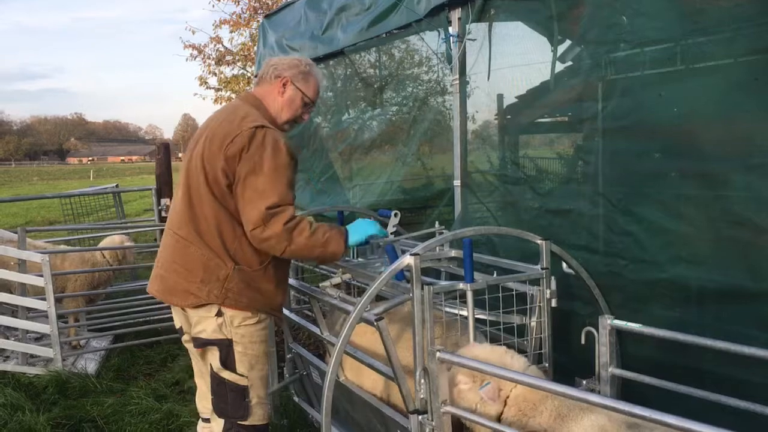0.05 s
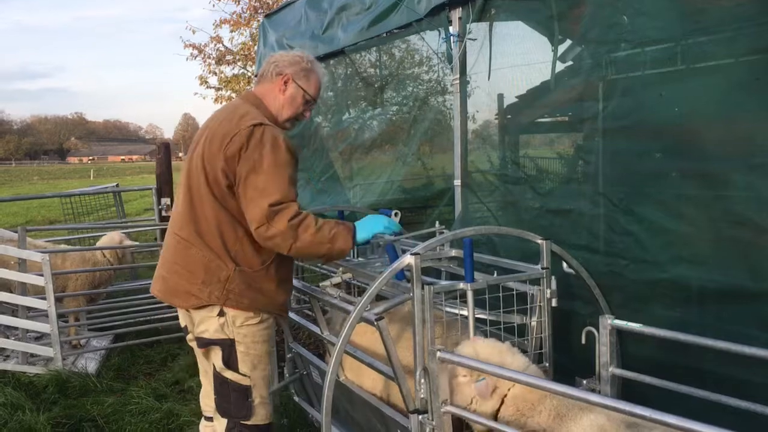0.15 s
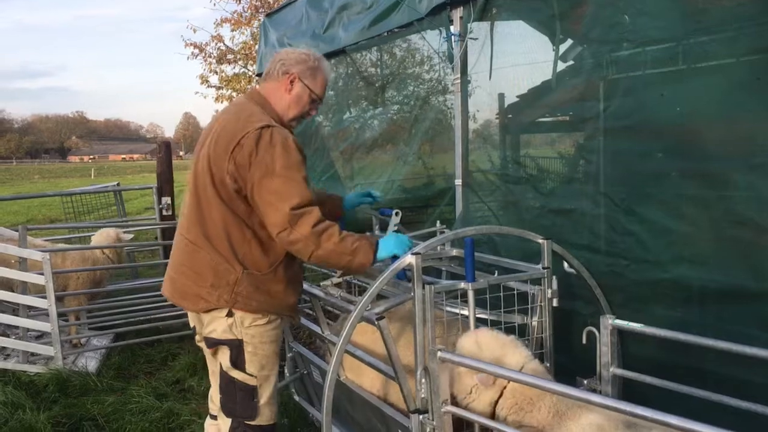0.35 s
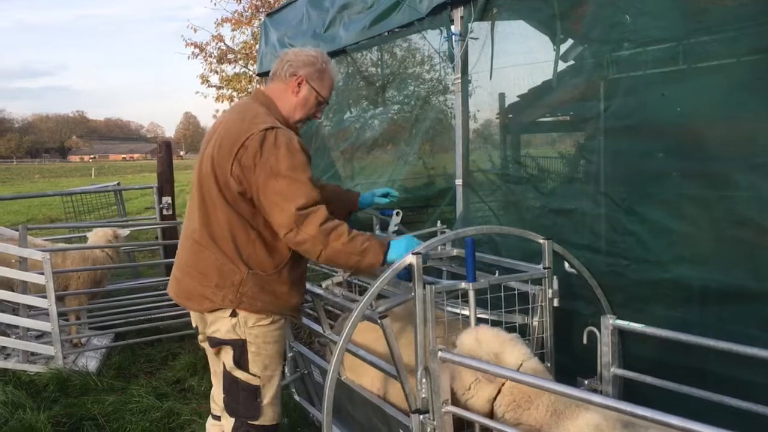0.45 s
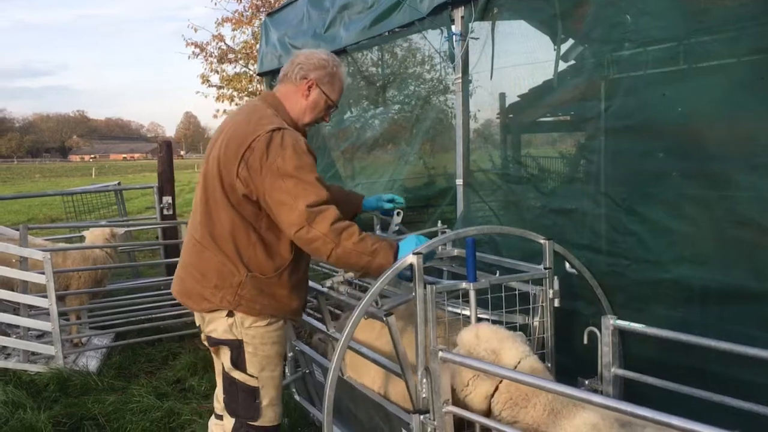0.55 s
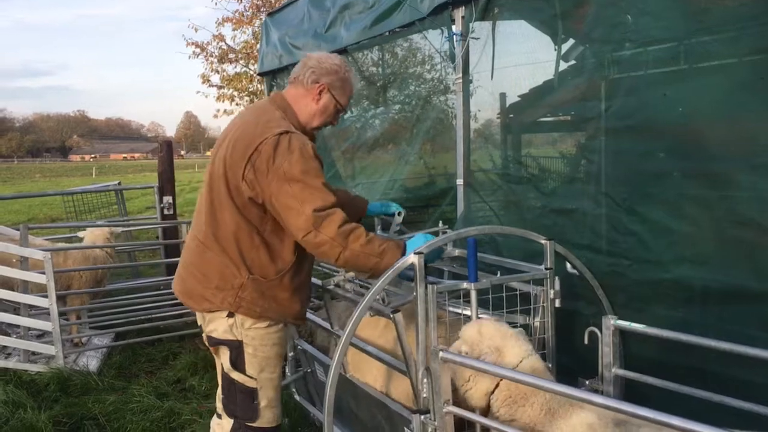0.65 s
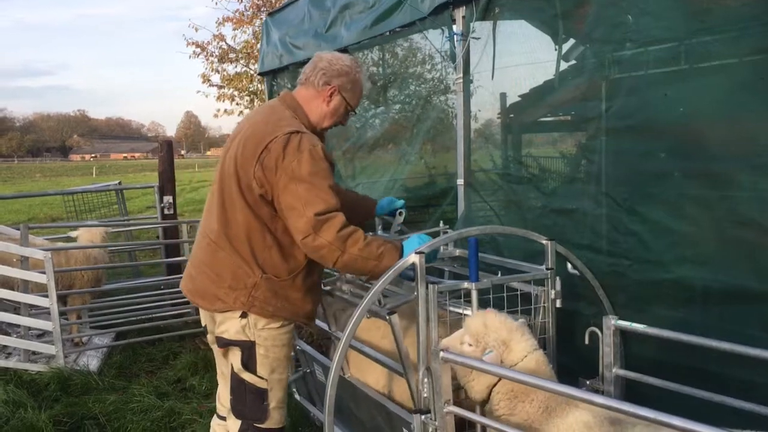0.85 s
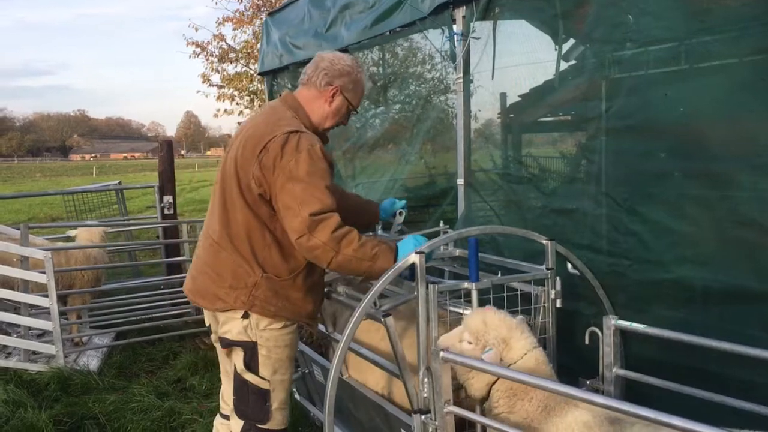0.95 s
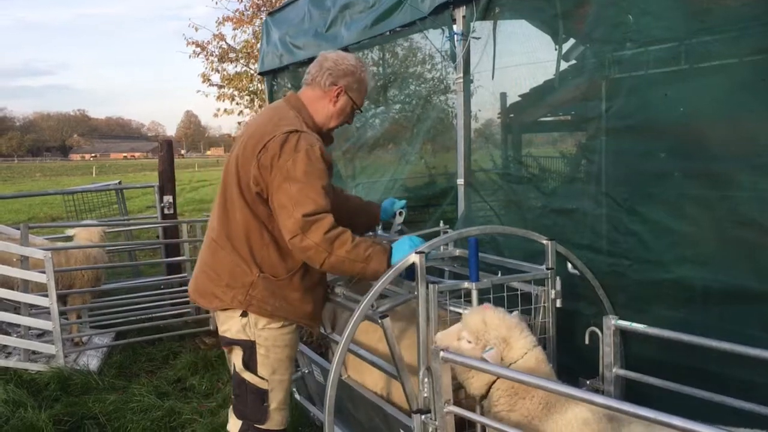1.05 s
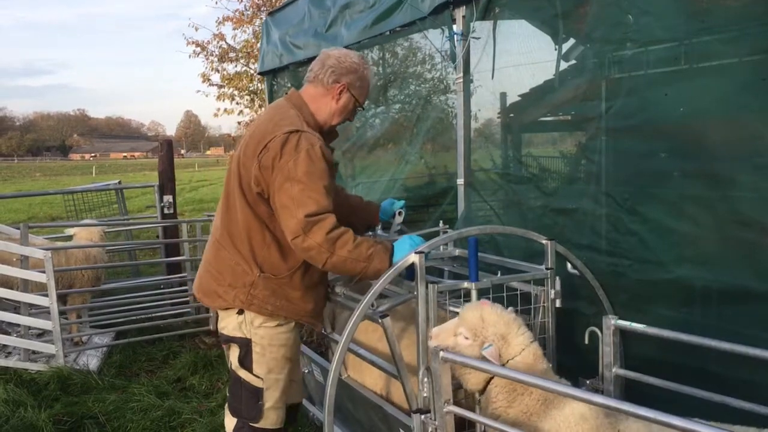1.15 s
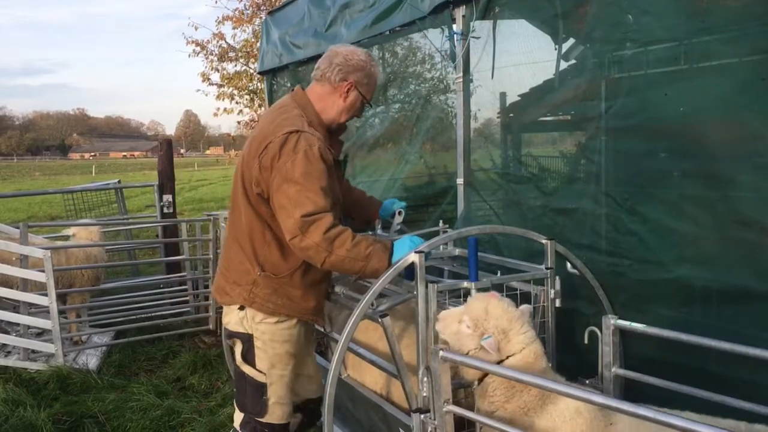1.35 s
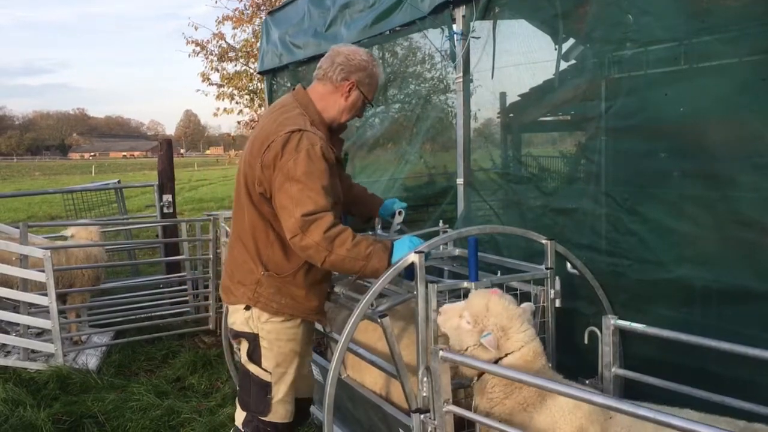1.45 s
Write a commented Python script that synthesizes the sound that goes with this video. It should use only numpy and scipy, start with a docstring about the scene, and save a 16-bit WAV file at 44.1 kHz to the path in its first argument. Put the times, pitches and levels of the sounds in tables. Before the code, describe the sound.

A metal gate on a sheep crate knocks loosely, squeaks once and bangs shut, its bars ringing and rattling. Small latch ticks and dull hoof thuds come in between, with a quiet outdoor rumble behind.

```python
"""Outdoors at a steel sheep crate. Over a low rumble, the animal shuffles and its hooves thud on the
floor plate. Loose bars knock and small latch parts tick. A dry pivot sticks and slips, giving one
shrill, ringing squeak. Then the gate slams and rebounds: each blow rings the frame, its tubes and
its side panels, and rattles the loose joints."""
import sys
import numpy as np
from scipy import signal
from scipy.fft import rfft, irfft
from scipy.io import wavfile

SR = 44100
rng = np.random.default_rng(int(sys.argv[2]) if len(sys.argv) > 2 else 0)


def generate_wav(sig):
    """Save sig (samples, or channels by samples) to the path in sys.argv[1] as 16-bit PCM at SR."""
    pcm = np.round(np.clip(np.atleast_2d(sig).T, -1, 1) * 32767).astype(np.int16)
    wavfile.write(sys.argv[1], SR, pcm)


N = 66150
T = np.arange(N) / SR
HZ = np.maximum(np.arange(N + 1) * SR / (2 * N), 1)


def from_db(db):
    """Turn decibels into a gain."""
    return 10 ** (np.asarray(db) / 20)


def unit_power(x):
    """Scale a sound to an average power of 1."""
    return x / np.sqrt(np.mean(x ** 2) + 1e-20)


def noise(colour, tilt_db=0, peaks_db=0):
    """Noise shaped by a table of frequencies and levels; a positive tilt makes it brighter."""
    hz, db = np.transpose(colour)
    shape_db = np.interp(np.log(HZ), np.log(hz), db)
    octaves = np.log2(np.clip(HZ, 700, 9000) / 1500)
    gain = from_db(shape_db + peaks_db + tilt_db * octaves)
    return unit_power(irfft(rfft(rng.standard_normal(2 * N)) * gain)[:N])


def drift(hz):
    """A smooth random wobble; more Hz makes it quicker."""
    return unit_power(signal.sosfilt(signal.butter(2, hz, fs=SR, output="sos"), rng.standard_normal(N)))


def fade(ring_s):
    """Die away by 60 dB over the ring time."""
    return np.exp(-np.log(1000) * T / ring_s)


def rise(seconds):
    """A soft start."""
    return 1 - np.exp(-T / max(seconds, 1e-4))


def delayed(x, start):
    """Start a sound at a time in seconds."""
    return np.concatenate([np.zeros(max(int(start * SR), 0)), x])[:N]


def fade_by_band(x, ring_times):
    """Let each frequency band die away at its own rate."""
    spectrum, centres = rfft(x, 2 * N), np.log([hz for hz, _ in ring_times])
    return sum(irfft(spectrum * np.interp(np.log(HZ), centres, share))[:N] * fade(ring_s)
               for share, (_, ring_s) in zip(np.eye(len(ring_times)), ring_times))


def ring(tones, wander=0):
    """The fading tones of struck steel, each a little random in strength; loose parts wander in pitch."""
    clock = T + wander * np.cumsum(drift(31.3)) / SR if wander else T
    return np.sqrt(2) * sum(
        from_db(db + rng.normal()) * fade(ring_s) * np.sin(2 * np.pi * (hz * clock + rng.random()))
        for hz, db, ring_s in tones)


def resonances(depth_db, spacing_hz):
    """The many small peaks and dips in a steel part's sound, in dB."""
    heights = np.clip(rng.standard_normal(2000), -2, 2)
    return depth_db * np.interp(HZ / spacing_hz, np.arange(2000), heights)


def rubbing_tone(hz, jitter):
    """Rubbing makes a tone of unsteady pitch; the real part of the result is the sound."""
    return np.sqrt(2) * np.exp(2j * np.pi * hz * np.cumsum(1 + jitter * drift(199)) / SR)


def rough_tone(hz, width_hz):
    """A tone that flutters within a narrow band."""
    phase = 2 * np.pi * hz * T
    return unit_power(drift(width_hz / 2) * np.cos(phase) + drift(width_hz / 2) * np.sin(phase))


# The outdoor air. Each row: frequency in Hz, relative level in dB.
AIR_COLOUR = [(15, -40), (26, -20), (40, -5.5), (60, 3.5), (120, -8), (250, -7.5), (450, -17), (1400, -22),
              (3000, -31), (5000, -34), (10000, -39.5), (15500, -43)]
def rumble():
    """A low, steady outdoor rumble."""
    return from_db(-51.5) * noise(AIR_COLOUR)


# How loud the shuffling is. Each row: time in seconds, level in dB.
SHUFFLE_LEVELS = [(0, -42.5), (.12, -48), (.18, -52.5), (.31, -52), (.48, -45), (.62, -56), (.75, -62),
                  (1.1, -82), (1.25, -42), (1.5, -59.5)]
# Its dull sound. Each row: frequency in Hz, relative level in dB.
SHUFFLE_COLOUR = [(20, -31), (70, -7), (140, -6), (250, 3.5), (400, -21.5), (1300, -8), (3000, -15.5),
                  (9000, -39.5)]
def shuffle():
    """The animal shuffles unevenly on the floor plate."""
    level_db = np.interp(T, *np.transpose(SHUFFLE_LEVELS)) + 2 * drift(16)
    return from_db(level_db) * noise(SHUFFLE_COLOUR)


# Hoof steps. Each row: start in seconds, relative level in dB.
HOOF_STEPS = [(.23, -53), (0.544, -35.5), (.625, -56), (1.40, -44.5)]
def hooves():
    """Hooves hit the floor plate with soft thuds that drop in pitch."""
    pitch_hz = 169.7 / (1 + T / 0.056)
    thud = np.sin(2 * np.pi * np.cumsum(pitch_hz) / SR) * rise(0.01) * fade(0.15)
    return sum(2 * from_db(db) * delayed(thud, start) for start, db in HOOF_STEPS)


# Latch ticks. Each row: start in seconds, level in dB, length in seconds.
LATCH_TICKS = [(.002, -52, 0.018), (.13, -68, 0.032), (.288, -71, 0.0071), (.324, -53.5, 0.036),
               (0.378, -54, 0.09), (0.425, -47, 0.061), (0.761, -59, 0.0079), (0.837, -54, 0.0085),
               (0.851, -49.5, 0.0089), (0.942, -55, 0.0083), (1.064, -49.5, 0.05), (1.147, -50.5, 0.019),
               (1.216, -49.5, 0.057), (1.292, -50.5, .007), (1.41, -57.5, 0.058)]
# Their bright sound. Each row: frequency in Hz, relative level in dB.
TICK_COLOUR = [(1500, -17.5), (3400, 6.5), (5000, -3.5), (8000, -0.5), (11000, -2), (15000, -11.5)]
def latch():
    """Small steel parts scrape; longer scrapes start more softly."""
    out, peaks_db = np.zeros(N), resonances(depth_db=7, spacing_hz=152)
    for start, db, length in LATCH_TICKS:
        scrape = noise(TICK_COLOUR, peaks_db=peaks_db) * from_db(2 * drift(300))
        out += from_db(db) * delayed(scrape * rise(0.088 * length) * np.exp(-T / length), start)
    return out


# Pin clinks. Each row: start in seconds, pitch in Hz, level in dB, ring time in seconds.
PIN_CLINKS = [(.856, 3350, -50.5, 0.042), (0.856, 3800, -47.5, 0.04), (1.408, 10000, -64, .6)]
def pins():
    """Loose pins clink, each with one fading tone."""
    return sum(from_db(db) * delayed(np.sin(2 * np.pi * hz * T) * fade(ring_s), start)
               for start, hz, db, ring_s in PIN_CLINKS)


# Thin whines. Each row: pitch in Hz, level in dB, loudest moment in seconds, half length in seconds.
PIVOT_WHINES = [(1330, -41, 0.448, 0.02), (4550, -55.5, 0.408, 0.036), (6600, -55, 0.435, 0.043),
                (8600, -56, 0.455, 0.065), (9300, -61.5, 0.464, 0.067), (11700, -62, 0.435, 0.05)]
def pivot_whine():
    """Light rubbing sings in thin, high tones as the pivot starts to turn."""
    return sum(from_db(db) * np.exp(-((T - middle) / half) ** 2) * rubbing_tone(hz, jitter=0.0148).real
               for hz, db, middle, half in PIVOT_WHINES)


# Squeals. Each row: start in seconds, pitch in Hz, level in dB, then in seconds the rise time,
# the time from the start until it fades, and the fade time.
SQUEALS = [(0.423, 2797, -32, 0.039, 0.03, 0.0074), (0.45, 2576, -21.5, 0.0044, 0.0073, 0.027),
           (0.453, 2839, -23, 0.031, 0.036, .009)]
# Their rough overtones. Each row: pitch in Hz, width in Hz, level in dB relative to the squeal.
OVERTONES = [(5430, 300, -19.5), (7980, 260, -17), (10750, 670, -27)]
# The lever's close, beating tones. Each row: pitch in Hz, level in dB, ring time in seconds.
LEVER_TONES = [(2363, -40, .33), (2482, -34, .3), (2525, -30, .28), (2616, -29, .35), (2647, -26.5, .35),
               (2795, -37, .35), (2868, -41, .65)]
# The rasp of the contact. Each row: frequency in Hz, relative level in dB.
RASP_COLOUR, RASP_DB = [(1000, -3), (3000, 1), (5000, 12.5), (8000, 4.5), (15000, -6)], -22
# The steel around the pivot. Each row: frequency in Hz, ring time in seconds.
STEEL_RING_TIMES, STEEL_DB = [(2600, 0.43), (5400, 0.37), (11000, 0.12)], -9
def pivot_squeak():
    """The dry pivot sticks and slips in clashing tones with a rasp; the steel and lever ring on."""
    squeal = np.zeros(N, complex)
    for start, hz, db, attack, hold, release in SQUEALS:
        swell = np.minimum(T / attack, 1) * np.exp(-np.maximum(T - hold, 0) / release)
        squeal += from_db(db) * rubbing_tone(hz, jitter=0.0138) * delayed(swell, start)
    squeal *= from_db(3 * drift(117))  # the level flutters
    overtones = sum(from_db(db) * rough_tone(hz, width) for hz, width, db in OVERTONES)
    rasp = from_db(RASP_DB) * noise(RASP_COLOUR)
    slip = squeal.real + np.abs(squeal) * (overtones + rasp)  # roughness follows the squeal's strength
    steel = unit_power(fade_by_band(rng.standard_normal(N), STEEL_RING_TIMES)) / np.sqrt(N)
    lever = delayed(ring(LEVER_TONES) * rise(0.012), start=0.452)
    return slip + from_db(STEEL_DB) * signal.fftconvolve(slip, steel)[:N] + lever


# The sound of the frame and its joints. Each row: frequency in Hz, relative level in dB.
FRAME_COLOUR = [(20, -40), (50, -14), (150, -2), (280, -9.5), (420, -13), (660, -4), (1000, -2), (1500, 0),
                (2200, -2.5), (3700, -10.5), (5000, -19), (9000, -29), (15000, -55)]
def rattle(tilt_db, hits_per_s=430, hit_s=0.0036, fade_s=0.026):
    """Loose joints clash in a quick, dying run of tiny hits."""
    hits = (rng.random(N) < hits_per_s / SR) * rng.random(N)
    bursts = signal.lfilter([1], [1, -np.exp(-1 / (hit_s * SR))], hits + 1e-18)
    return unit_power(bursts) * noise(FRAME_COLOUR, tilt_db) * np.exp(-T / fade_s)


# Blows on the frame; the loudest three are the slam. Each row: start in seconds, level in dB,
# treble tilt in dB per octave, rise time in seconds, relative panel boom in dB.
BLOWS = [(0.0, -40.5, -4.5, 0.001, -4), (.052, -38, -3, 0.0036, -2), (.191, -33, 0.1, 0.00074, -19),
         (.331, -38.5, -4.5, 0.0032, -29), (0.363, -41.5, -6, 0.014, 6), (.428, -41.5, 0, 0.0033, 3),
         (.538, -47, -10.5, 0.0017, 3.5), (0.9514, -27.5, 3.8, 0.0023, -5.5),
         (.964, -24.5, -1.5, 0.0018, -7), (.98, -28, 6.2, 0.0014, 3.5), (1.154, -33.5, -.5, 0.0014, -5.5),
         (1.195, -41, -8.5, 0.0033, 7), (1.299, -46.5, 0.8, 0.0019, 1), (1.418, -60, -16, 0.002, 2)]
# How long the frame rings. Each row: frequency in Hz, ring time in seconds.
FRAME_RING_TIMES = [(100, 1), (500, 0.77), (1300, 0.61), (2800, 0.42), (5000, 0.35), (9000, 0.25),
                    (14000, 0.19)]
# Tones of the tubes and side panels. Each row: pitch in Hz, relative level in dB, ring time in seconds.
TUBE_TONES = [(655.6, -6.5, 0.55), (1029, -9.5, 0.99), (1059, -17, 1), (1101, -15, 1), (1155.6, -6.5, 0.78),
              (1382, -6, 0.37), (1449, -10.5, 1), (1459, 0, 0.18), (1583, -10.5, 0.93), (2140, -18.5, 0.55),
              (2413, -7, 0.78), (2914, -12, 0.9), (3544, -12.5, 0.8), (5400, -21.5, 0.63)]
PANEL_TONES = [(162.4, -0.5, 0.63), (237.4, 0.5, 0.36), (291.6, 0, 0.13)]
def knocks_and_slam():
    """Each blow from the bars or gate rings the frame, tubes and panels, and shakes the joints."""
    out, peaks_db = np.zeros(N), resonances(depth_db=4, spacing_hz=69.57)
    for start, db, tilt_db, rise_s, boom_db in BLOWS:
        frame = fade_by_band(noise(FRAME_COLOUR, tilt_db, peaks_db), FRAME_RING_TIMES)
        tubes = from_db(-10.5) * ring(TUBE_TONES)
        joints = from_db(-2.5) * rattle(tilt_db - 1)
        boom = from_db(boom_db - 6.5) * ring(PANEL_TONES, wander=0.018) * rise(0.017)
        out += from_db(db) * delayed((frame + tubes + joints) * rise(rise_s) + boom, start)
    return out


def scene():
    """Add all the sounds into one channel."""
    crate = knocks_and_slam() + latch() + pins() + pivot_whine() + pivot_squeak()
    return (crate + hooves() + shuffle() + rumble())[None]


def record(dry):
    """Cut the highest treble steeply, above 15900 Hz."""
    return signal.sosfilt(signal.ellip(12, .1, 80, 15900, fs=SR, output="sos"), dry)


dry = scene()
out = record(dry)
generate_wav(out)
```